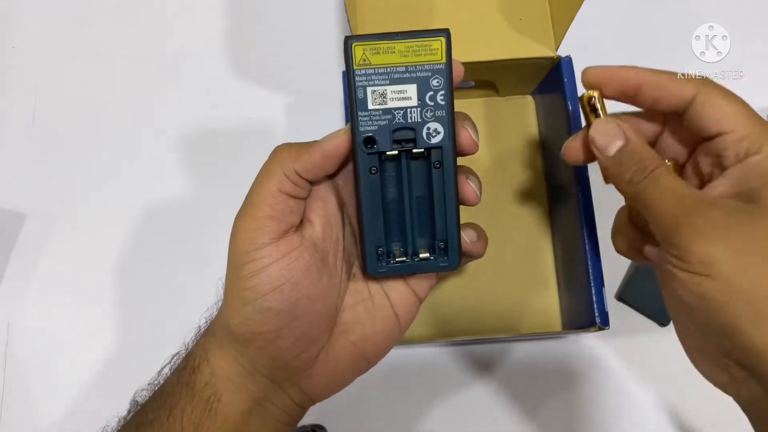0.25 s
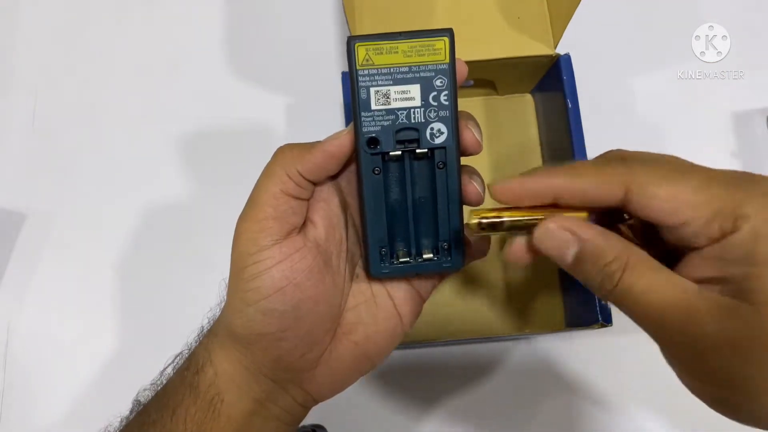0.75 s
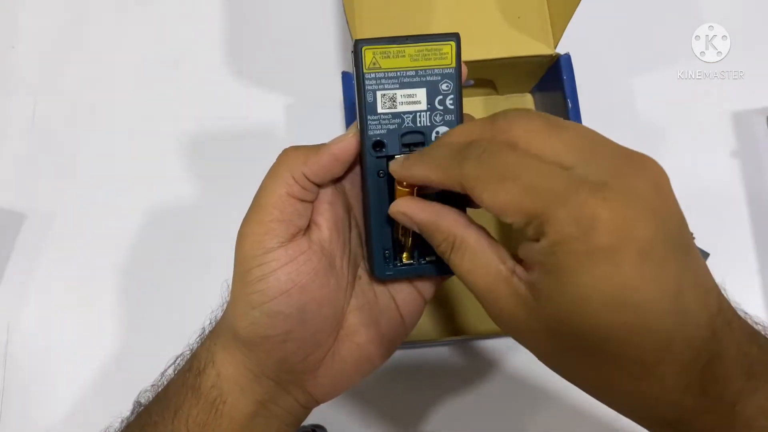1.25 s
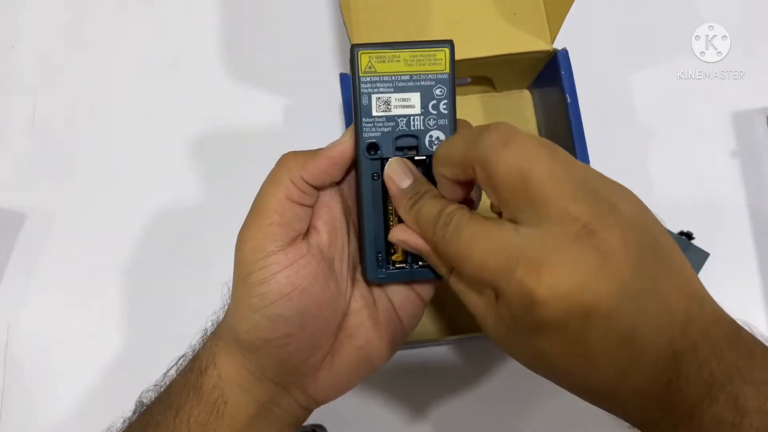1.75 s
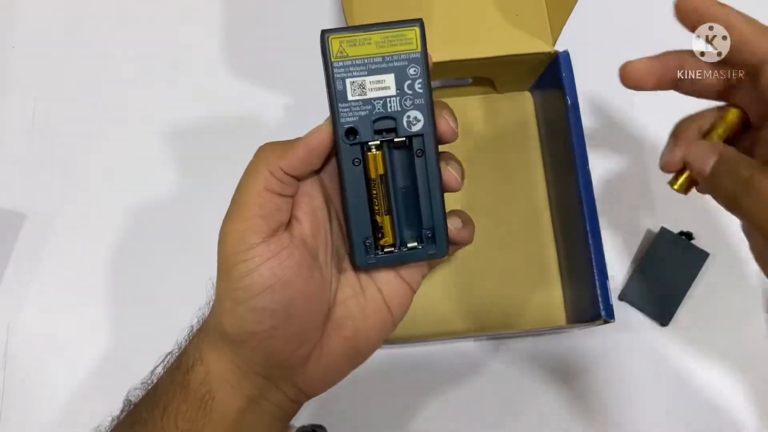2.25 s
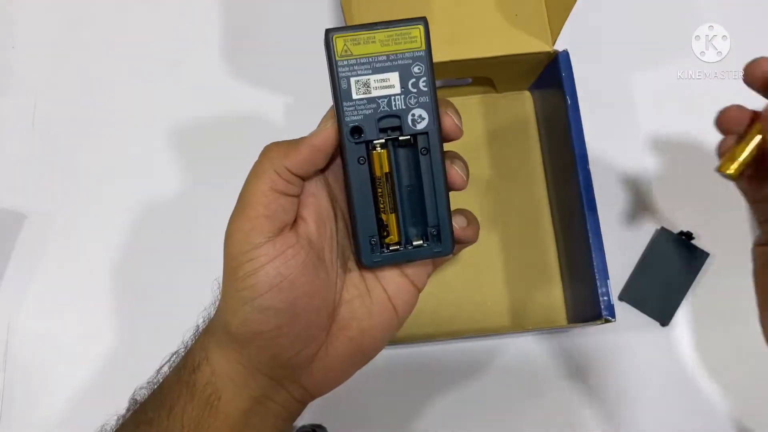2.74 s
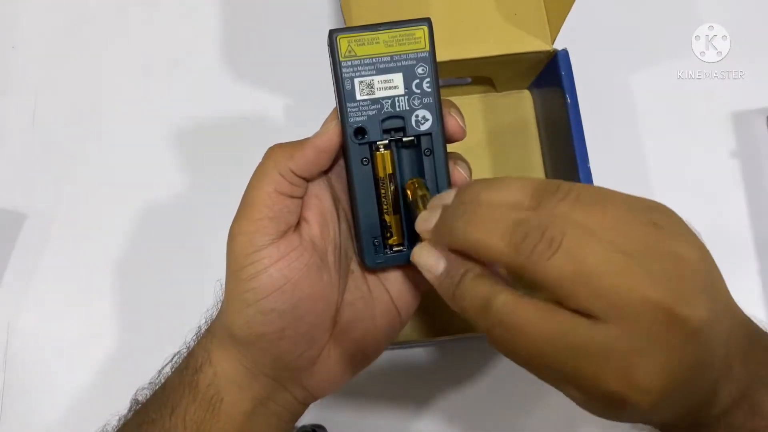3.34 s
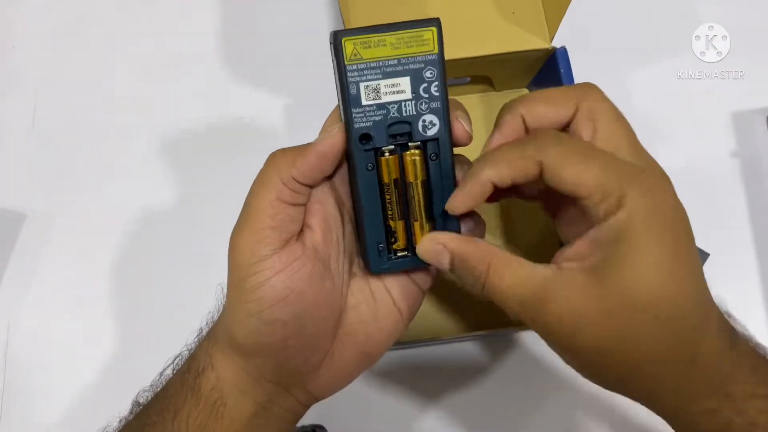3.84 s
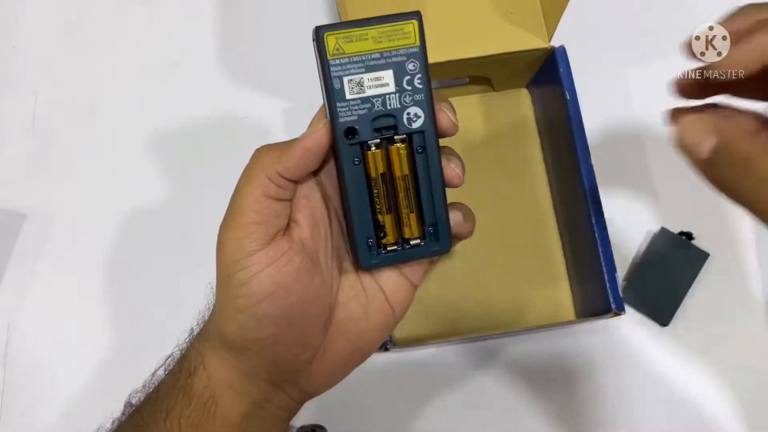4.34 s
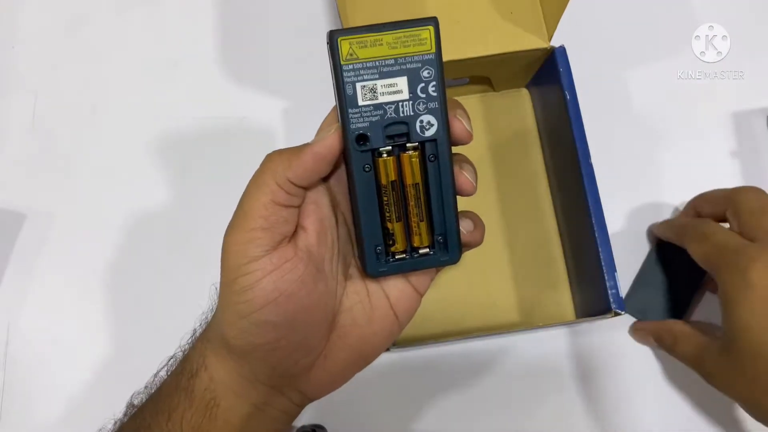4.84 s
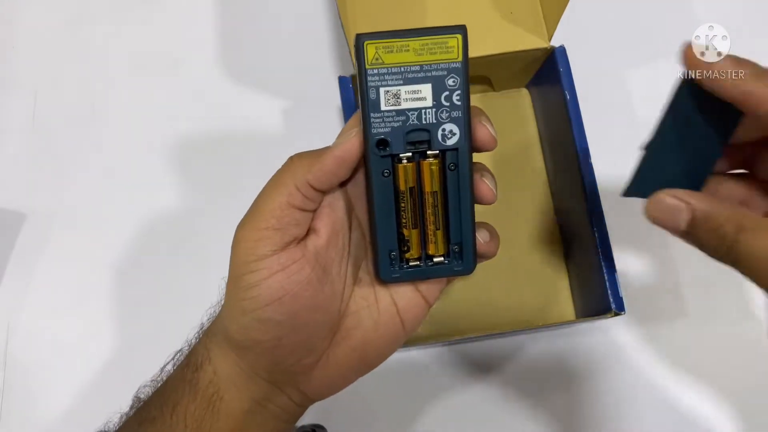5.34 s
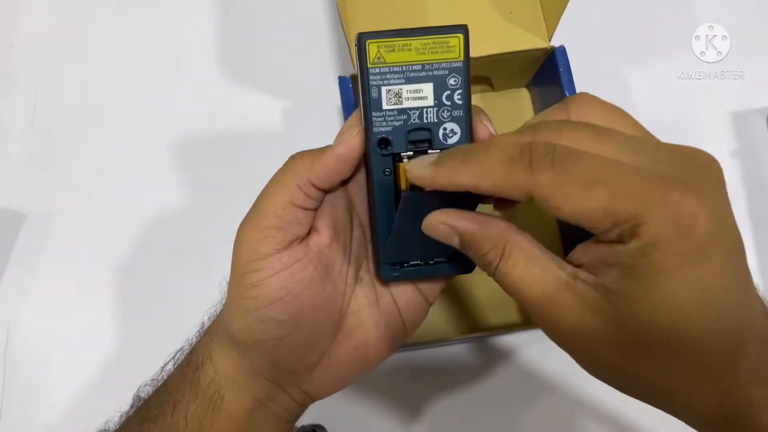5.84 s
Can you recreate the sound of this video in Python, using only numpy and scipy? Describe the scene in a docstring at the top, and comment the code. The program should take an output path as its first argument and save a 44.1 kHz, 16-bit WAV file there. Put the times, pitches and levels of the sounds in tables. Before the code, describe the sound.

Close plastic clacks and metallic spring ticks as two cells are pressed into a handheld device, a lid softly clicking home, fan humming behind.

```python
"""A fan's drone is heard first; then two small batteries snap into the plastic case of a hand-held device.
Cells scrape over spring contacts, squeak and tick; last, the thin cover is picked up, slides and clicks home.
The fan is shaped noise with wavering hums. Each snap or tick rings a part's modes and adds a bright crack.
Scrapes are showers of tiny touches, and squeaks are short rising tones.
A phone's two microphones hear it from close above, in a small room."""
import sys
import numpy as np
from scipy import signal
from scipy.fft import rfft, irfft
from scipy.io import wavfile
from scipy.ndimage import uniform_filter1d

SR = 44100
rng = np.random.default_rng(int(sys.argv[2]) if len(sys.argv) > 2 else 0)


def to_wav(sig):
    """Store sig (one row per channel, or 1-D mono) as 16-bit WAV at the path in sys.argv[1].

    Samples outside -1..1 are clipped; the rate is SR.
    """
    pcm = np.clip(np.atleast_2d(sig), -1, 1) * 32767
    pcm = np.round(pcm).astype(np.int16)
    wavfile.write(sys.argv[1], SR, pcm.T)  # frames by channels


N = 268331  # length of the scene in samples
RING = 4096  # length of one touch in samples
CONTACT_S = .0009  # a touch takes about this long to swell


def undb(db):
    """Turn decibels into a gain."""
    return 10 ** (np.asarray(db) / 20)


def along(hz, table, axis=1):
    """Read one column of a table, with straight lines between its rows on a log-frequency axis."""
    table = np.asarray(table, float)
    return np.interp(np.log(np.maximum(hz, 1)), np.log(table[:, 0]), table[:, axis])


def colour(x, points):
    """Filter a sound by a table of frequencies and levels."""
    size = x.shape[-1]
    hz = np.arange(size // 2 + 1) * SR / size
    return irfft(rfft(x) * undb(along(hz, points)), size)


def unit(x):
    """Scale a sound so that its energy, averaged over the channels, is 1."""
    energy = np.sum(x ** 2, axis=-1)
    return x / np.sqrt(np.mean(energy))


def fade(t, t60):
    """Die away exponentially, by 60 dB in t60 seconds."""
    return np.exp(-np.log(1000) * t / t60)


def contact_swell(t):
    """Rise smoothly from silence as a contact is made."""
    return 1 - np.exp(-t / (CONTACT_S / 2))


def left_right(left, right):
    """Stack two values as a column: left channel, right channel."""
    return np.array([[left], [right]])


def add(out, s, sound):
    """Mix a sound in at a time in seconds."""
    start = int(s * SR)
    out[:, start:start + sound.shape[1]] += sound[:, :N - start]


def walk(rate_hz):
    """Wander slowly by chance: random levels are held, then smoothed twice; the spread is near 1."""
    size = int(SR / rate_hz)
    held = np.repeat(rng.standard_normal(N // size + 1), size)
    return np.sqrt(2) * uniform_filter1d(uniform_filter1d(held, size), size)[:N]


# spectrum of fan and air before resonances and ripple: pitch_hz, level_db (per Hz)
AIR_SPECTRUM = [(25, -87), (44, -86), (55, -72.5), (76, -68), (108, -78), (138, -66.5), (205, -65),
                (390, -73.5), (560, -70), (880, -73.5), (1350, -84.5), (2700, -87), (6000, -100),
                (11500, -116), (14500, -135)]
# the drone's resonances: pitch_hz, width_hz, lift_db
DRONE_RESONANCES = [(70.2, 7.1, 11.5), (98.4, 10.6, 8), (128.5, 17, 5.5), (164.8, 10.5, 9),
                    (184.5, 3.9, 11), (273, 7.3, 7), (300.7, 7.6, 12.5), (360.5, 45, 7.5),
                    (448.1, 28.6, 10.5), (1990, 140, -3), (4320, 110, 3.5)]
# the air at the two microphones: pitch_hz, likeness (0 to 1), left_minus_right_db
AIR_STEREO = [(50, 0.95, 0), (154, 0.96, -3.5), (316, 1, -7), (460, 0.96, -7), (680, 0.89, -2),
              (1040, 0.11, 2.5), (1730, 0.56, 1.5), (3120, 0.28, 2), (5530, 1, 0), (10000, 0.73, 0)]


def fan_air(waver_db=0.57, ripple_db=2.0, ripple_hz=14):
    """Rushing air is noise that booms in the room's resonances, nearly alike at both microphones in the bass."""
    hz = np.arange(N // 2 + 1) * SR / N
    db = along(hz, AIR_SPECTRUM)
    for pitch_hz, width_hz, lift_db in DRONE_RESONANCES:
        db = db + lift_db / (1 + (2 * (hz - pitch_hz) / width_hz) ** 2)
    # above the lone resonances, crowded standing waves ripple the spectrum
    ripple = uniform_filter1d(rng.standard_normal(len(hz)), int(ripple_hz * N / SR))
    db = db + ripple_db * ripple / ripple.std() * (hz > 480)

    # the left noise shares part of the right noise
    likeness = np.clip(along(hz, AIR_STEREO), 0, 1)
    right, other = rfft(rng.standard_normal((2, N)))
    left = likeness * right + np.sqrt(1 - likeness ** 2) * other
    sides = undb(along(hz, AIR_STEREO, axis=2) * left_right(1, -1) / 2)
    sides = sides / np.sqrt(np.mean(sides ** 2, axis=0))
    air = irfft(np.array([left, right]) * sides * undb(db), N)
    # the square root makes the levels count per Hz
    return air * np.sqrt(SR / 2) * undb(waver_db * walk(5.16))


# steady hum and whine of the fan motor: pitch_hz, level_db (rms, before wavering), left_minus_right_db
MOTOR_LINES = [(57.7, -48.5, -1), (893.6, -57, 3), (2681.5, -69, 5)]


def fan_motor(waver_db=2.0, drift_hz=0.34):
    """The motor hums and whines on a few tones whose pitch and level wander slightly."""
    out = np.zeros((2, N))
    for pitch_hz, level_db, side_db in MOTOR_LINES:
        hz = pitch_hz + drift_hz * walk(3.12)
        tone = np.sqrt(2) * np.sin(2 * np.pi * np.cumsum(hz) / SR)
        out += tone * undb(level_db + waver_db * walk(4.1) + left_right(side_db, -side_db) / 2)
    return out


def fan():
    """The drone is rushing air together with the motor's tones."""
    return fan_air() + fan_motor()


# colour of the walls' answer: pitch_hz, level_db
WALL_COLOUR = [(500, -6), (1800, -.5), (2600, -2), (3300, 1), (4400, 3), (5300, -0.5), (7000, -8.5),
               (11000, -1.5), (15000, -15)]
WALL_DB, WALL_T60_S = -12.5, 0.32  # level before colouring
WALL_TREBLE_T60_S, WALL_SPLIT_HZ = 0.29, 11000
DESK_DB, DESK_T60_S = -12.5, 0.039


def room(x, desk_lag_s=0.0027, wall_lag_s=0.011):
    """Desk and cardboard box reflect quickly; then the walls leave a short tail whose treble dies sooner."""
    t = np.arange(SR // 2) / SR
    desk = unit(rng.standard_normal((2, len(t))) * fade(t, DESK_T60_S) * (t > desk_lag_s))
    noise = rng.standard_normal((2, len(t)))
    low = signal.sosfiltfilt(signal.butter(2, WALL_SPLIT_HZ, fs=SR, output="sos"), noise)
    treble = noise - low
    tail = low * fade(t, WALL_T60_S) + treble * fade(t, WALL_TREBLE_T60_S)
    walls = unit(tail * (t > wall_lag_s))
    echo = undb(DESK_DB) * desk + undb(WALL_DB) * colour(walls, WALL_COLOUR)
    # rows 0 and 1 go straight to the microphones, row 2 goes out into the room
    return x[:2] + signal.fftconvolve(x[2:], echo, axes=1)[:, :N]


def favour(hz, centre_hz, spread):
    """A touch excites frequencies near its centre most; the spread is in octaves."""
    octaves = np.log2(np.maximum(hz, 1) / centre_hz)
    return 1 / (1 + (octaves / spread) ** 2)


# the cracks lose their very top: pitch_hz, level_db
CRACK_TOP = [(12000, -1), (14000, -5), (16000, -3)]


def edge_crack(centre_hz, spread=0.89, t60=0.0068):
    """Hard edges meet in milliseconds of bright noise, partly alike at the two microphones."""
    t = np.arange(RING) / SR
    noise = rng.standard_normal(RING) + .5 * rng.standard_normal((2, RING))
    band = favour(np.arange(RING // 2 + 1) * SR / RING, centre_hz, spread) ** 2
    crack = colour(irfft(rfft(noise) * band), CRACK_TOP)
    return unit(crack * contact_swell(t) * fade(t, t60))


# modes of each part: case with its cells, a cell's cradle, thin cover, its rim on the desk,
# contact spring and a cell's steel can: pitch_hz, peak_db (relative height in the spectrum), t60_s
PART_MODES = {"case": [(775, -6, 0.012), (1048, -4.5, 0.016), (1404, -1.5, 0.011), (1755, 2, 0.0092),
              (2130, 3.5, 0.016), (2486, 0.5, 0.017), (2880, -6, 0.02), (3240, -.5, 0.017),
              (4000, -8, 0.0072), (4490, -0.5, 0.022), (4790, -6.5, 0.015), (5320, -7, .0075),
              (6450, -11, 0.0046), (7500, -18, .005), (10080, -12.5, 0.0068), (11330, -29, .0097)],
              "cradle": [(1046, 1, 0.015), (1550, -1.5, 0.012), (1780, 0.5, 0.012), (1940, 0.5, .03),
              (2170, 3.5, 0.013), (2880, -11, 0.013), (3330, -4.5, .028)], "cover": [(900, -15, .0069),
              (2050, 1, 0.0082), (2450, 0, 0.011), (2900, 1, 0.007), (3800, 2, 0.0064), (4630, -17, 0.006),
              (5430, -4, 0.0067), (6170, -18, .006), (6900, -9, .006), (8300, -10, .006),
              (9450, -15, .006)], "rim": [(2410, -1, .008), (3460, 4, .012), (4130, -9, .008),
              (4750, -4, 0.012), (5420, 0, .016), (6000, -8, .01), (8500, -11, .008), (9400, -18, .008)],
              "spring": [(2470, -4, 0.0072), (3950, -2.5, 0.011), (4520, 1, 0.0095), (5040, 0, 0.013),
              (5830, -8, 0.0059)], "can": [(7400, 9, 0.049), (8880, 0, .09), (9700, -6, .1), (9600, -6, .1),
              (10890, -6, .1)]}
# where a part's faces cancel each other and it hardly sounds: pitch_hz, width_hz, depth_db
PART_HOLLOWS = {"case": [(1190, 130, -17), (3630, 330, -9), (6300, 520, -14)], "cradle": [(1260, 110, -14)],
                "cover": [(3360, 150, -8)]}
MIC_PHASE_SPREAD = .3  # radians of chance in each mode's phase at each microphone


def part_ring(part, centre_hz, spread):
    """A touch sets off a part's modes; its place and hardness favour those round a centre."""
    hz, db, t60 = np.transpose(PART_MODES[part])[:, :, None]
    t = np.arange(RING) / SR
    # a slowly dying mode starts softer for the same height in the spectrum
    gain = undb(db) * favour(hz, centre_hz, spread) / t60
    # the grip shifts every mode a little
    hz = hz * (1 + .012 * rng.standard_normal(hz.shape))
    # neighbouring modes swing in opposite senses; each microphone sees them from its own side
    opposite = np.pi * np.arange(len(hz))[:, None]
    phase = opposite + MIC_PHASE_SPREAD * rng.standard_normal((2, len(hz), 1))
    modes = gain * fade(t, t60) * np.sin(2 * np.pi * hz * t + phase)
    ring = contact_swell(t) * np.sum(modes, axis=1)
    for hollow_hz, width_hz, depth_db in PART_HOLLOWS.get(part, []):
        peak = signal.iirpeak(hollow_hz, hollow_hz / width_hz, fs=SR)
        ring = ring - (1 - undb(depth_db)) * signal.lfilter(*peak, ring)
    return unit(ring)


def all_round(part, centre_hz, spread, widening=1.9):
    """The room receives a part's sound from all sides at once: its modes broaden and merge, without hollows."""
    mode_hz, db, t60 = np.transpose(PART_MODES[part])[:, :, None]
    hz = np.arange(RING // 2 + 1) * SR / RING
    width = widening * np.log(1000) / (np.pi * t60)
    peaks = (undb(db) * favour(mode_hz, centre_hz, spread)) ** 2
    power = peaks / (1 + ((hz - mode_hz) / width) ** 2) ** 2
    # the pulse is symmetrical, so move it later to keep its rise
    pulse = np.roll(irfft(np.sqrt(power.sum(axis=0))), int(4 * CONTACT_S * SR))
    return unit(pulse * (np.arange(RING) < RING // 2))


def touch(part, db, centre_hz, spread, crack_db, crack_hz, right_db):
    """A touch rings a part and cracks at the contact, a little to one side; rows: left, right, into the room."""
    crack = undb(crack_db) * edge_crack(crack_hz)
    ring = undb(db) * part_ring(part, centre_hz, spread)
    direct = (ring + crack) * undb(left_right(-right_db, right_db) / 2)
    to_room = undb(db) * all_round(part, centre_hz, spread) + crack.mean(axis=0)
    return np.vstack([direct, to_room])


# a cell squeaks as it is forced past the contact:
# start_s, length_s, level_db (rms at the strongest), first_pitch_hz, last_pitch_hz
SQUEAKS = [(3.876, .012, -38, 1590, 1790), (3.891, .009, -36.5, 2150, 2350), (3.893, .006, -36, 2520, 3120)]


def squeaks(jitter=.04):
    """For a few milliseconds the slips fall into step: a rough, rising chirp."""
    out = np.zeros((3, N))
    for start_s, length_s, level_db, first_hz, last_hz in SQUEAKS:
        size = int(length_s * SR)
        hz = np.linspace(first_hz, last_hz, size) * (1 + jitter * walk(1600)[:size])
        chirp = np.sin(2 * np.pi * np.cumsum(hz)[None] / SR)
        add(out, start_s, undb(level_db) * np.sqrt(2) * np.hanning(size) * chirp)
    return out


# slides swell and fade: strongest_s, swell_s, part, level_db (at the strongest), pitch_hz (centre),
# hiss_db, hiss_pitch_hz
SCRAPES = [(3.659, 0.0077, "case", -43.5, 4900, -49, 10600),
           (3.8815, 0.0077, "spring", -36, 4200, -62, 9500), (3.887, .012, "case", -38, 2900, -56, 3500),
           (3.897, 0.013, "spring", -46, 4500, -55, 10500), (4.818, .012, "rim", -51, 4600, -64, 4500),
           (4.8306, .004, "rim", -44, 5400, -57, 5500), (4.840, 0.0064, "rim", -47, 4900, -46, 3800),
           (5.378, 0.0061, "cover", -39.5, 6600, -43, 12000),
           (5.385, .0045, "cover", -41, 8000, -52, 11000), (5.625, .023, "cover", -73, 10500, -72, 11000),
           (5.698, .02, "cover", -75, 11000, -65, 10500)]
# how each part answers a slide: spread_octaves, right_minus_left_db
SLIDE_ANSWER = {"case": (0.67, 2), "cover": (0.17, 1), "rim": (0.81, 1), "spring": (.8, 4.5)}
FADE_PER_SWELL = 1.1  # a slide fades this many times as long as it swells


def scrapes(slips_hz=1900, scatter_db=4.5):
    """Sliding parts stick and slip: a swelling, fading shower of tiny touches."""
    out = np.zeros((3, N))
    for strongest_s, rise, part, level_db, centre_hz, hiss_db, hiss_hz in SCRAPES:
        fall = rise * FADE_PER_SWELL
        spread, right_db = SLIDE_ANSWER[part]
        t = np.arange(-2 * rise, 2 * fall, 1 / SR)
        pressure = np.exp(-2 * np.where(t < 0, t / rise, t / fall) ** 2)
        # slips come at random moments, with random sizes and signs
        sizes = rng.choice([-1, 1], len(t)) * undb(scatter_db * rng.standard_normal(len(t)))
        slips = sizes * (rng.random(len(t)) < slips_hz / SR)
        # the tiny offset avoids dividing by zero if no slip falls
        force = unit(slips * pressure + 1e-12) * np.sqrt(np.sum(pressure ** 2))
        contact = touch(part, level_db, centre_hz, spread, hiss_db, hiss_hz, right_db)
        add(out, strongest_s - rise * 2, signal.fftconvolve(force[None], contact, axes=1))
    return out


# light ticks of metal ends and plastic edges:
# start_s, part, level_db, pitch_hz (centre), crack_db, right_minus_left_db
TICKS = [(1.0643, "case", -35, 2640, -61, -1), (1.1236, "spring", -23.5, 6000, -60, 6),
         (1.1237, "can", -40, 8800, -60, 2), (1.2082, "case", -53, 9000, -52, -1),
         (1.629, "case", -45.5, 6500, -51, -1), (3.432, "case", -46, 4600, -72, -1),
         (3.6440, "spring", -46, 4500, -62, 0), (3.6506, "spring", -41, 5200, -42, 3),
         (3.6577, "spring", -39, 5000, -53, 6), (3.8300, "case", -48, 4500, -58, 1),
         (3.876, "spring", -36, 4400, -64, 2), (3.8830, "spring", -25.5, 4700, -54, 1),
         (3.8885, "spring", -28.5, 4300, -58, 3), (3.9027, "case", -34, 4000, -44, -3),
         (3.9650, "spring", -25, 5600, -45, 3), (5.937, "cover", -40, 2800, -59, -1),
         (5.9511, "cover", -37.5, 3000, -66, 0)]
TICK_SPREAD, TICK_CRACK_HZ = 0.98, 10600  # spread in octaves


def ticks(hold_s=0.001):
    """Light single touches with a high crack, each with the energy of its levels held for a moment."""
    out = np.zeros((3, N))
    for start_s, part, level_db, centre_hz, crack_db, right_db in TICKS:
        tick = touch(part, level_db, centre_hz, TICK_SPREAD, crack_db, TICK_CRACK_HZ, right_db)
        add(out, start_s, tick)
    return np.sqrt(hold_s * SR) * out


# a cell or the cover snaps home, then rebounds: start_s, part, level_db, pitch_hz (centre),
# spread_octaves, crack_db, crack_pitch_hz, rebound_after_s, rebound_db (against the snap)
SNAPS = [(1.1233, "case", -15.5, 2850, 0.84, -36.5, 9600, 0.0082, -14),
         (1.7404, "case", -14.5, 2700, 0.92, -40, 9800, 0.0048, -28),
         (3.9649, "cradle", -15.5, 1700, 1.4, -39.5, 10500, .012, -15.5),
         (5.9476, "cover", -26.5, 2830, 1, -45.5, 10000, .0073, -11)]
SNAP_RIGHT_DB = 1.5  # right minus left: a little to the right
REBOUND_SPREAD, REBOUND_CRACK_DB = 0.8, -24  # octaves; dB against the snap's crack


def snaps(hold_s=0.0016):
    """Firm touches, each with the energy of its levels held for a moment; the part rebounds once."""
    out = np.zeros((3, N))
    for start_s, part, level_db, centre_hz, spread, crack_db, crack_hz, rebound_s, rebound_db in SNAPS:
        snap = touch(part, level_db, centre_hz, spread, crack_db, crack_hz, SNAP_RIGHT_DB)
        add(out, start_s, snap)
        # the rebound rings a narrower range and hardly cracks
        rebound = touch(part, level_db + rebound_db, centre_hz, REBOUND_SPREAD,
                        crack_db + REBOUND_CRACK_DB, crack_hz, SNAP_RIGHT_DB)
        add(out, start_s + rebound_s, rebound)
    return np.sqrt(hold_s * SR) * out


def turn(x, leads):
    """Sound reaches the two microphones at different phases, so turn them against each other."""
    lead = along(np.arange(N // 2 + 1) * SR / N, leads)
    return irfft(rfft(x) * np.exp(1j * lead * left_right(1, -1) / 2), N)


# phase of the fan at the two microphones: pitch_hz, left_lead_radians
FAN_LEAD = [(150, 0), (320, 0.3), (600, 2.0), (1150, 1.73), (1550, 0.58), (2150, .5), (2700, 1.74),
            (5200, 1.14), (6400, 1.5), (8000, 3.5), (10500, 7), (13000, 8), (15000, 11)]
# phase of the hands' sounds just below the microphones: pitch_hz, left_lead_radians
HAND_LEAD = [(500, .3), (1030, 1.2), (1460, 0.27), (2400, 1.1), (3000, 1.33), (4700, 0.55), (6000, 1.25),
             (8000, 3.06), (10500, 7), (15000, 9.5)]


def scene():
    """The handling sounds ring out in the room, over the fan's drone."""
    drone = turn(fan(), FAN_LEAD)
    handling = snaps() + ticks() + scrapes() + squeaks()
    return turn(room(handling), HAND_LEAD) + drone


def record(dry):
    """The phone cuts the top with a steep low-pass filter at 15900 Hz."""
    return signal.sosfilt(signal.ellip(8, .2, 70, 15900, fs=SR, output="sos"), dry)


dry = scene()
out = record(dry)
to_wav(out)
```